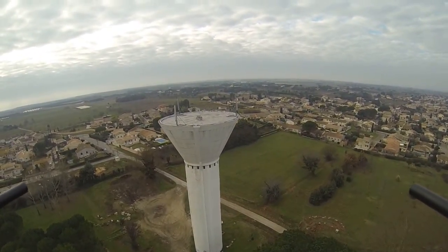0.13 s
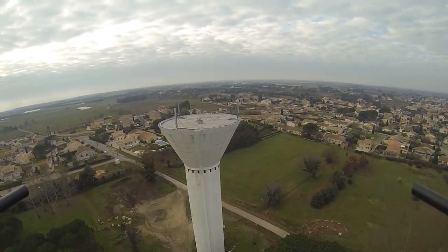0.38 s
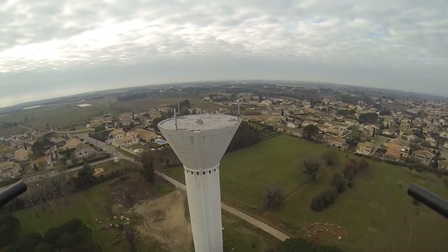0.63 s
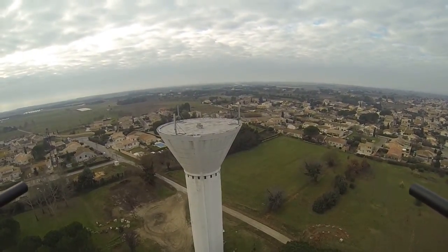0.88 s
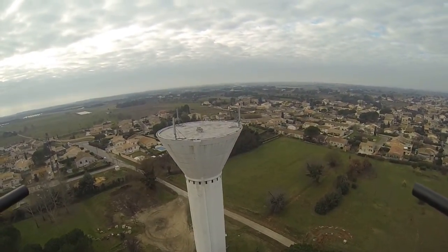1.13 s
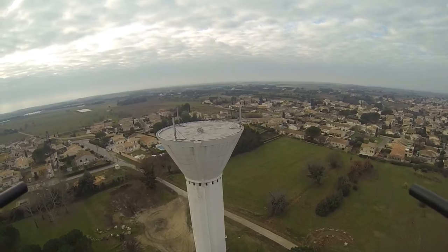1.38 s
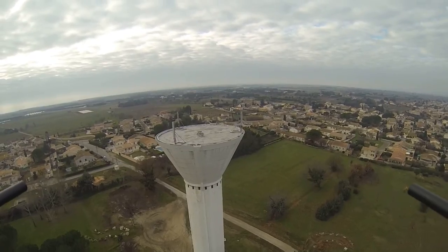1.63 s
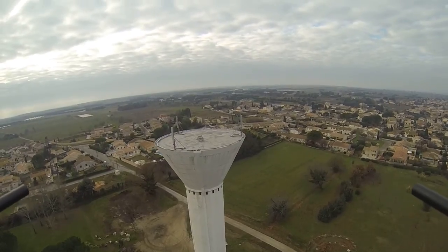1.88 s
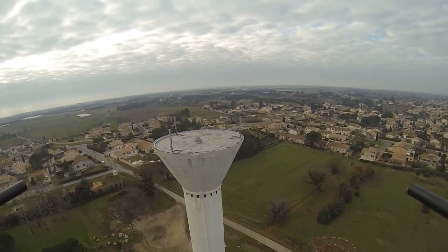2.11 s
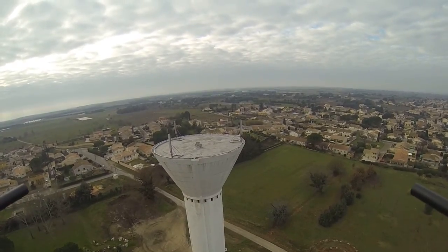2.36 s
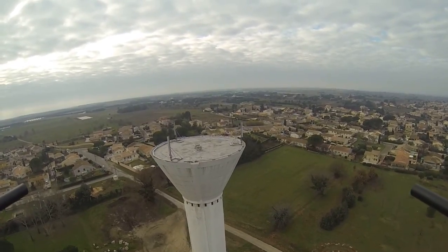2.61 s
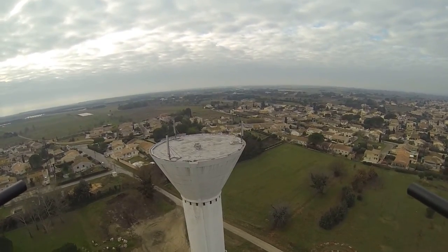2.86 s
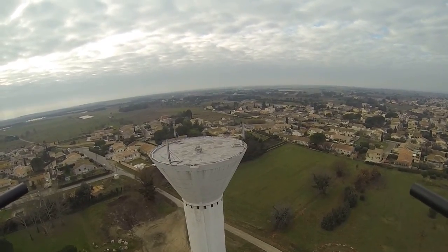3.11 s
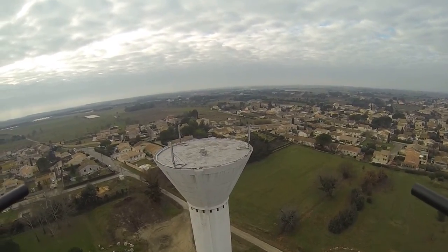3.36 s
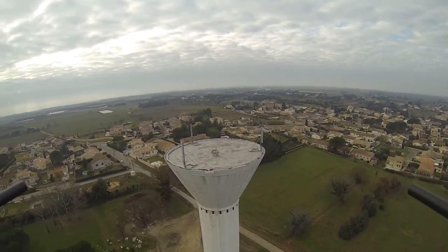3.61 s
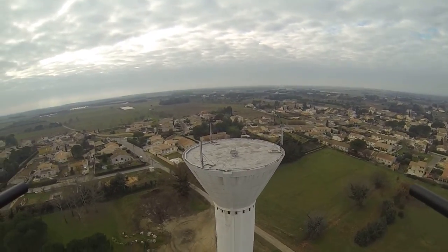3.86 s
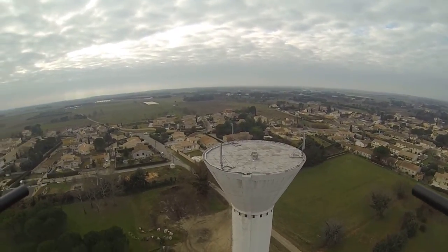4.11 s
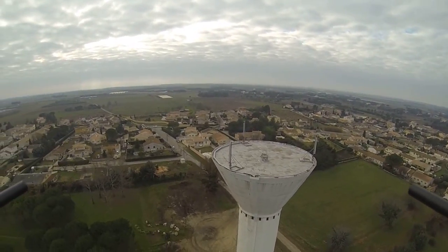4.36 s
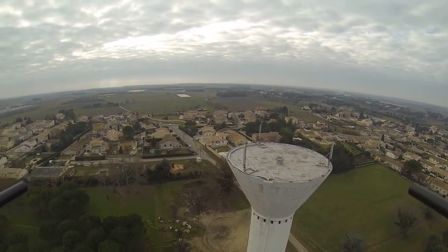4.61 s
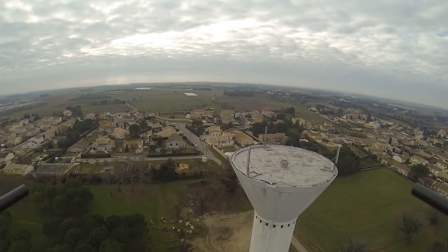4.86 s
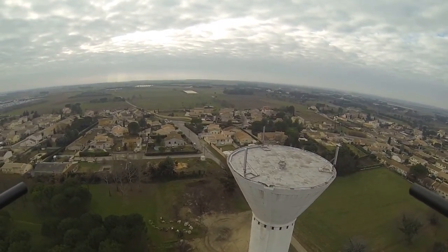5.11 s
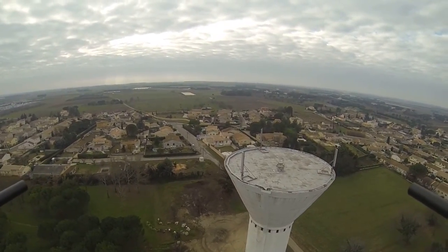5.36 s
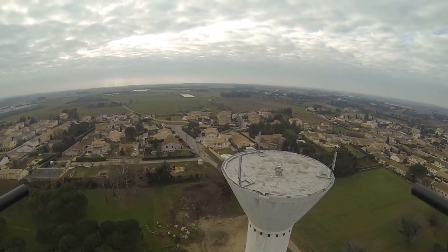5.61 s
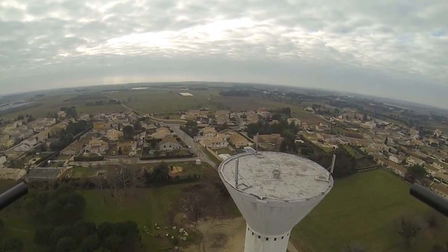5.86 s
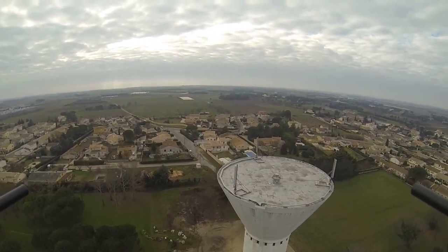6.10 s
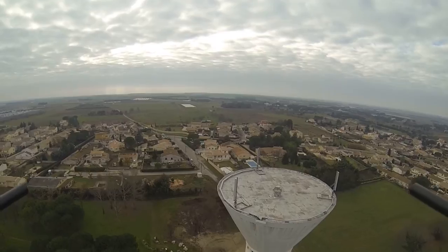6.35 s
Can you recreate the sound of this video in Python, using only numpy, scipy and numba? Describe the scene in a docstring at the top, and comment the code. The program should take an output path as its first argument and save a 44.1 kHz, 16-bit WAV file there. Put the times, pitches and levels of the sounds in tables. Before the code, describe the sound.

Four small drone rotors hum loudly at very close range, a low throbbing drone with rough beating, boxy air rush and faint high motor whine.

```python
"""Under a hovering quadcopter

A camera in a closed case hangs under a hovering quadcopter, all four rotors within an arm's length.
Slightly different shaft speeds shake the frame and beat; blade turbulence rings the case, and the
motor coils and speed controllers whine faintly as sums of tones. Fast gain control lifts the hiss
whenever the two slowest rotors cancel."""
import sys
import numpy as np
from scipy import signal
from scipy.fft import rfft, irfft
from scipy.io import wavfile
from scipy.ndimage import uniform_filter1d
from numba import njit

SR = 44100
rng = np.random.default_rng(int(sys.argv[2]) if len(sys.argv) > 2 else 0)


def boost(x):
    """Linear amplitude factor 10**(x/20) for a level x in decibels (scalar or array-like)."""
    u = np.asarray(x, float) / 20
    return 10 ** u


def transcribe(u):
    """Save the signal u as a 16-bit wav file named by the first command-line argument.

    u: samples, shape (n,) or (channels, n), limited to [-1, 1]; the rate is SR.
    q: integer samples, one column per channel.
    """
    v = np.clip(np.atleast_2d(u).T, -1, 1)
    q = np.round(v * 32767).astype(np.int16)
    wavfile.write(sys.argv[1], SR, q)


N = 285768  # samples, 6.48 s

# resonances of the closed case: pitch_hz, width_hz, level_db (ring relative to the direct sound)
CASE_RINGS = [(323, 25, 3.5), (443.5, 40, 5), (531, 29, 9.5), (762, 36, -6), (1206, 160, -3.5),
              (1444, 64.7, 14.5), (1792, 120, 6), (2185, 150, 9.5), (3148, 77, 5.5), (3426, 130, 10),
              (8250, 400, 7)]


def walk(rate):
    """Slow random wander: levels held 1 / rate s and slewed twice; spread near 1."""
    hold = int(SR / rate)
    held = np.repeat(rng.standard_normal(N // hold + 1), hold)
    return 1.6 * uniform_filter1d(uniform_filter1d(held, hold), hold)[:N]


def rotor_speeds(t):
    """Hover speeds plus the flight controller's mixed commands, smoothed by inertia, plus hunting."""
    # mean speed of each rotor in the hover: speed_turns_per_s
    hover = [97.3, 99.4, 110, 114.7]
    # quick balancing, speeding one side and slowing the other: time_s, roll_turns_per_s
    roll = [(0.0, 0.43), (0.78, 0.09), (1.14, 0.83), (1.57, -0.78), (2.11, 0.93), (2.56, 0.07),
            (3.19, -0.68), (3.34, 2.32), (3.56, -0.56), (3.73, 1.64), (3.88, 0.58), (4.03, 1.3),
            (4.25, -3.22), (4.5, 2.34), (4.77, -4.63), (4.97, -1.97), (5.41, -0.28), (6.23, 0.71),
            (6.33, 2.38), (6.48, 2.06)]
    # slower trims: time_s, lift_turns_per_s, pitch_turns_per_s, yaw_turns_per_s
    trims = [(0.0, -0.31, -0.28, 1.04), (0.34, 0.06, -0.1, 0.73), (1.34, -0.13, -0.31, 0.47),
             (1.62, -0.01, -0.45, -0.33), (1.87, -0.14, -0.48, 0.24), (2.71, -0.1, -1.09, -0.48),
             (2.93, -0.18, -0.29, -0.79), (3.56, -0.14, 0.09, -0.68), (3.71, -0.1, 0.22, -0.14),
             (4.85, 0.03, 0.71, -0.55), (5.33, -0.25, 0.58, 0.2), (5.63, 0.51, 0.35, 0.31),
             (6.37, 0.44, 0.42, 0.68), (6.48, 0.72, -0.52, 1.35)]
    # which way each command moves rotors 1-4 (signs): rows roll, lift, pitch, yaw
    mixer = [(-1, 1, -1, 1), (1, 1, 1, 1), (-1, -1, 1, 1), (-1, 1, 1, -1)]
    # the faster pair hunts about its set speed: rotor_index, swing_turns_per_s (each way), first_peak_s
    hunting = [(2, .6, -.003), (3, 3.7, .009)]
    roll_lag_s = (.04, .04, 0, 0)  # the slower pair answers the roll late
    inertia_s, hunt_hz, hunt_slip_turns = .06, 18.73, .05

    trim_s, *commands = np.transpose(trims)
    trim = np.transpose(mixer[1:]) @ [np.interp(t, trim_s, command) for command in commands]
    speeds = []
    for k, mean_speed in enumerate(hover):
        balance = mixer[0][k] * np.interp(t - roll_lag_s[k], *np.transpose(roll))
        commanded = mean_speed + trim[k] + balance
        speeds.append(uniform_filter1d(commanded, int(inertia_s * SR), mode="nearest"))
    for k, swing, peak_s in hunting:
        cycle = hunt_hz * (t - peak_s) + hunt_slip_turns * walk(4)  # uneven hunting
        # each cycle climbs for 70 % of its length, then falls
        speeds[k] = speeds[k] + swing * signal.sawtooth(2 * np.pi * (cycle + .7), .7)
    return speeds


def rotor(turns, start, column, tremble_turns=0.0029, flutter_db=1.5, shaft_flutter_db=0.6):
    """Unbalance gives the shaft tone, the two blades the even tones, the coils the multiples of seven."""
    # rms tones before any ringing: shaft_multiple, rotor_1_db, rotor_2_db, rotor_3_db, rotor_4_db
    rotor_tones = [(1, -14.5, -18, -36.5, -22), (2, -25, -35, -28, -28.5), (3, -34.5, -39.5, -38, -49.5),
                   (4, -46, -43, -36, -47), (5, -44, -52, -48.5, -51), (6, -52.5, -58.5, -62, -55),
                   (8, -55.5, -52.5, -59.5, -55), (11, -56, -60, -56.5, -55), (12, -57, -61.5, -58, -59.5),
                   (13, -61, -52, -57, -63.5), (14, -59, -58, -66, -70.5), (15, -59.5, -61.5, -66, -64),
                   (21, -62, -64, -68.5, -80), (42, -84.5, -89, -79.5, -81.5), (49, -90.5, -91.5, -87, -92),
                   (84, -95.5, -97, -85, -94.5)]
    shaky_turns = turns + tremble_turns * walk(40)
    tones = []
    for row in rotor_tones:
        multiple = row[0]
        flutter = (flutter_db if multiple > 1 else shaft_flutter_db) * walk(9.4)
        # odd tones start from the heavy side, even tones from the blades
        phase = multiple * (shaky_turns + start[1 - multiple % 2])
        tones.append(np.sqrt(2) * boost(row[column] + flutter) * np.cos(2 * np.pi * phase))
    return sum(tones[:4]), sum(tones[4:])  # low hum, higher whine


def ring(x, modes, colour=1):
    """Resonances add to the direct sound, here as a gain per frequency, times a further colour."""
    hz = np.maximum(np.arange(N // 2 + 1) * SR / N, 1)
    resonance = 1
    for pitch_hz, width_hz, level_db in modes:
        detune = (hz / pitch_hz - pitch_hz / hz) * pitch_hz / width_hz
        resonance = resonance + boost(level_db) / (1 + 1j * detune)
    return irfft(rfft(x) * colour * np.abs(resonance), N)


def sum_tones(turns, double_db=-40, triple_db=-44):
    """Rotors 1 and 3, shaking together what rattles or bends, add tones at sums of their multiples."""
    slow, fast = 2 * np.pi * turns[0], 2 * np.pi * turns[2]
    double_sum = boost(double_db) * np.cos(2 * slow + 2 * fast)
    return double_sum + boost(triple_db) * np.cos(3 * slow + 2 * fast)


def rush(turns, chop=0.4, gust_db=1.6, rush_db=-24):
    """Blade turbulence: noise swelling at each blade pass, coloured by the air path and the case."""
    # how rough the air through the blades is: time_s, level_db (relative)
    roughness = [(0, -0.5), (0.801, -0.5), (1.501, 0), (2.2, 0.5), (2.901, -2), (3.399, -0.5), (3.9, 3.5),
                 (4.5, -1.6), (5.1, 2), (5.7, -0.3), (6.48, 2)]
    # colour of the air path, before the case rings: pitch_hz, level_db (relative)
    air_path = [(18, -0.5), (36, -18.5), (90, -10), (155, -14), (210, 1.5), (270, -14.5), (365, -21),
                (480, -13.5), (900, -19.5), (1600, -26.5), (2600, -40.5), (3560, -47), (3800, -52),
                (5600, -56), (7000, -66), (11000, -66)]
    air = 0
    for turn in turns:
        blade_pass = 1 + chop * np.cos(4 * np.pi * turn)  # two blades per turn
        air = air + blade_pass * boost(gust_db * walk(9)) * rng.standard_normal(N)
    air = air * boost(np.interp(np.arange(N) / SR, *np.transpose(roughness)))
    hz = np.maximum(np.arange(N // 2 + 1) * SR / N, 1)
    path_hz, path_db = np.transpose(air_path)
    colour = boost(np.interp(np.log(hz), np.log(path_hz), path_db))
    rushing = ring(air, CASE_RINGS, colour)
    return boost(rush_db) * rushing / rushing.std()


def controllers(turns, drift_hz=2.5, pulse_db=-15):
    """Each controller switches near 8 kHz; its whine pulses with the turning of its motor."""
    # whine of each controller, peak level before pulsing: pitch_hz (before drift), level_db
    switching = [(8070, -71.5), (8082, -62.5), (8089, -68), (8108, -70.5)]
    whine = 0
    for (pitch_hz, level_db), turn in zip(switching, turns):
        pulse = 1 + boost(pulse_db) * (np.cos(2 * np.pi * turn) + np.cos(4 * np.pi * turn))
        cycles = np.cumsum(pitch_hz + drift_hz * walk(8.8)) / SR
        whine = whine + boost(level_db) * pulse * np.cos(2 * np.pi * cycles)
    return whine


def scene():
    """Four rotors shake frame, mounts and case, with their air and their controllers close by."""
    # where each rotor stands at the start: heavy_side_turns, blade_turns
    starts = [(.51, .176), (.312, .173), (.968, .092), (.987, .471)]
    # the frame rings under the low tones: pitch_hz, width_hz, level_db (over the direct hum)
    frame_rings = [(214, 12, -2), (430, 14, 3), (502, 20, 2)]
    # the motor mounts ring: pitch_hz, width_hz, level_db (over the direct whine)
    mount_rings = [(4160, 100, 8), (4495, 70, 19), (4880, 250, 10), (5290, 70, 14), (9060, 150, 15)]
    turns = [np.cumsum(speed) / SR for speed in rotor_speeds(np.arange(N) / SR)]
    rotors = [rotor(turn, starts[k], k + 1) for k, turn in enumerate(turns)]
    hum, whine = np.sum(rotors, axis=0)
    shaking = ring(hum, frame_rings) + ring(whine, CASE_RINGS + mount_rings)
    return (shaking + sum_tones(turns) + rush(turns) + controllers(turns))[None]


@njit
def follow(x, attack, release, start):
    """Peak follower: quick up, slower down."""
    level, out = start, np.empty(len(x))
    for i in range(len(x)):
        level += (abs(x[i]) - level) * (attack if abs(x[i]) > level else release)
        out[i] = level
    return out


def top_cut(x):
    """Nothing passes above the cut-off."""
    return signal.sosfilt(signal.butter(12, 15600, fs=SR, output="sos"), x)


def record(dry, skew=0.1, bass_hz=45, shake=2.136, shake_hz=150, attack_s=0.00082, release_s=0.097,
           ratio=20.0, aim_db=-0.5, step_db=0.15, top_hz=8800):
    """The microphone capsule bends under the shaking; stepped gain evens the peaks; tops are rounded."""
    bend = signal.sosfilt(signal.butter(2, bass_hz, "high", fs=SR, output="sos"), dry[0] ** 2)
    x = dry[0] - skew * bend
    # the gain control senses the shaft tones more strongly than they are heard
    low_shake = signal.sosfilt(signal.butter(2, shake_hz, fs=SR, output="sos"), x)
    sensed = x + shake * low_shake
    peak = follow(sensed, 1 / (attack_s * SR + 1), 1 / (release_s * SR + 1), 1.0)
    gain_db = (aim_db - 20 * np.log10(peak)) * (1 - 1 / ratio)
    x = x * boost(step_db * np.round(gain_db / step_db))  # small gain steps that tick
    x = x / (1 + (x / .8) ** 8) ** (1 / 8)  # rounds the highest tops below 0.8
    x = signal.sosfilt(signal.butter(4, top_hz, fs=SR, output="sos"), x)
    return top_cut(x[None])


dry = scene()
out = record(dry)
transcribe(out)
```